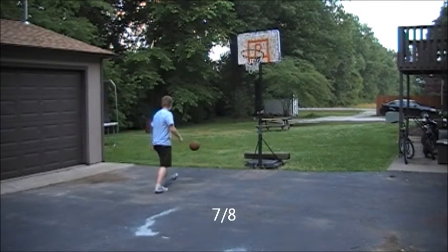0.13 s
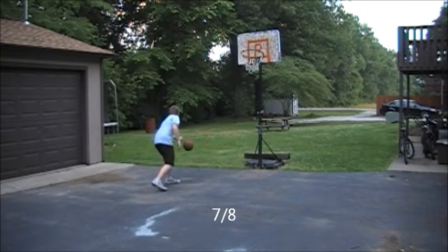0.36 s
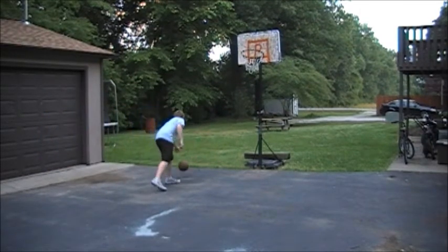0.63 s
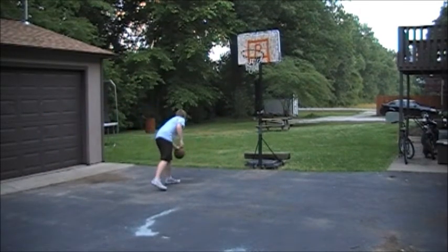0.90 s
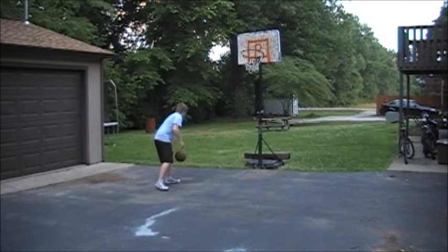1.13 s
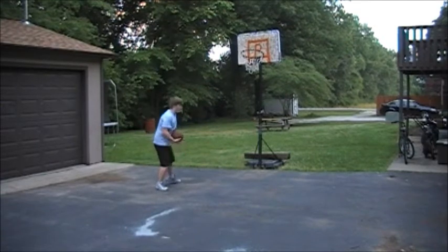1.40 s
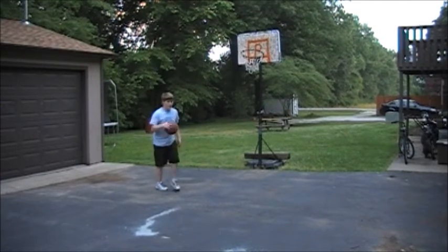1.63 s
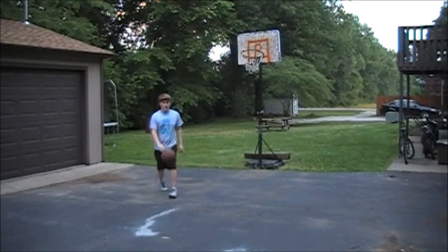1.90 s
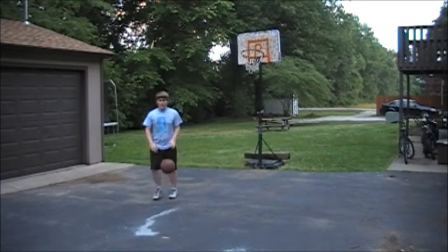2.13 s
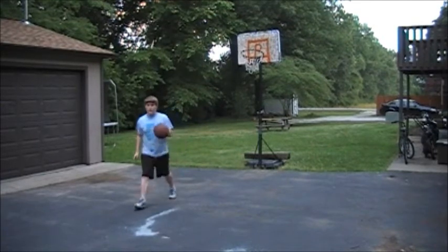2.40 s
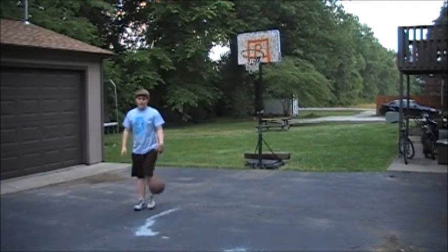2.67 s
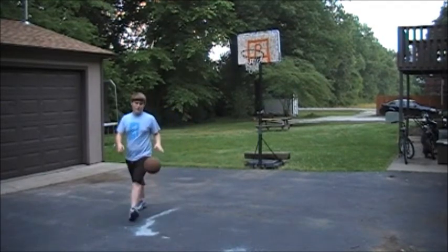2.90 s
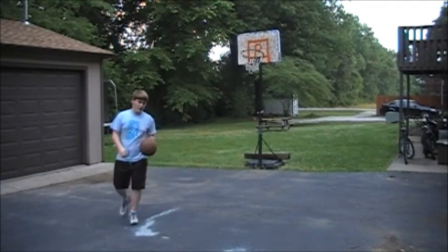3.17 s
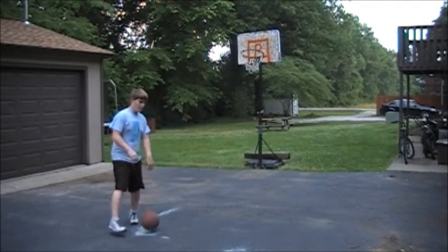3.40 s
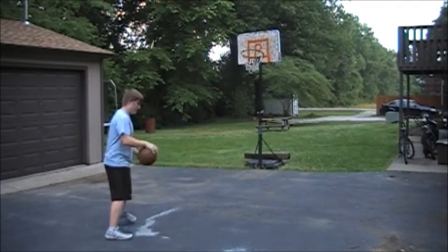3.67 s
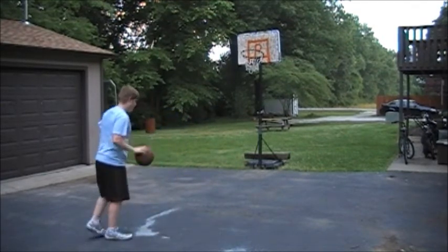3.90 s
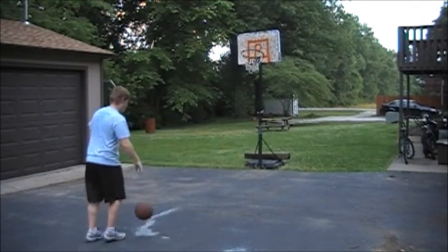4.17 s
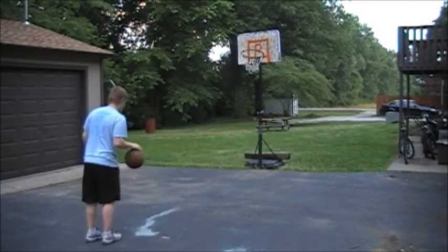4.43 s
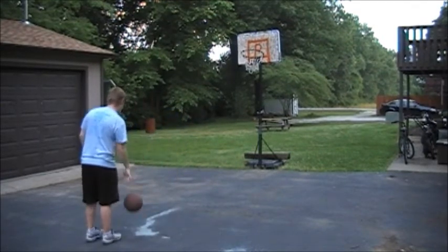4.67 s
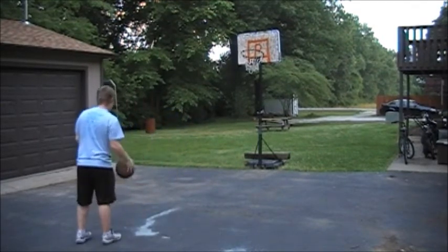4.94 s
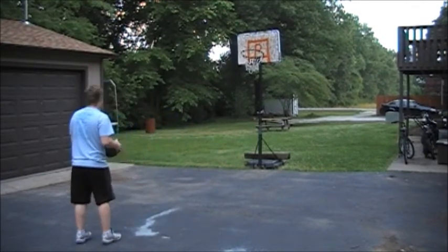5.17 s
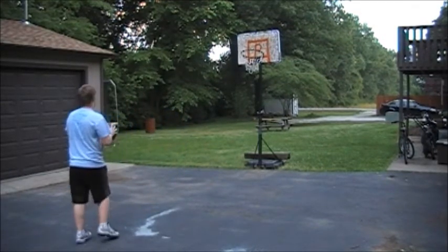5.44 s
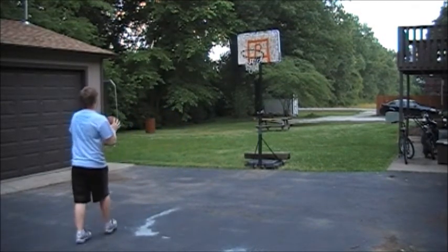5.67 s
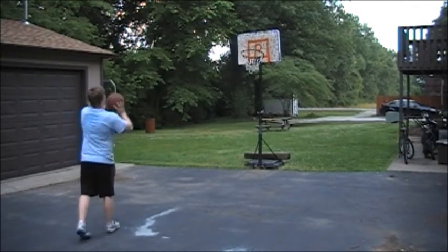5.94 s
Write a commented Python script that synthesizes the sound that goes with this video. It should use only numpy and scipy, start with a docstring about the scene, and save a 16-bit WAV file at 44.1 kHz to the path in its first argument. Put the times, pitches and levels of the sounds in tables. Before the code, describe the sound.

A stereo microphone stands back in a yard beside a garage. A rubber ball smacks asphalt about every two thirds of a second, with some longer gaps, giving a hollow ping and quick wall echoes. Shoes drag on grit and palms tap the ball. Thin whistles and crickets are faint at first; once the ball falls silent, warbles, chips and chattering birds come forward, joined by a high insect-like buzz.

```python
"""A basketball is dribbled on an asphalt driveway between a garage and a house.
Each bounce rings the ball's modes, slaps back from the walls as delayed blows and dies away as noise.
Filtered noise makes the scuffing shoes, hand pats, crickets, a late buzz and the outdoor hush;
gliding sines make the birds."""
import sys
import numpy as np
from scipy import signal
from scipy.fft import rfft, irfft
from scipy.io import wavfile

SR = 44100
rng = np.random.default_rng(int(sys.argv[2]) if len(sys.argv) > 2 else 0)


def how_loud(loudness_db):
    """Turn decibels into a plain amplitude multiplier (0 dB gives 1, 20 dB gives 10)."""
    steps = np.asarray(loudness_db, float) / 20
    return 10 ** steps


def transcribe(u):
    """Save the signal u as a 16-bit wav file named by the first command-line argument.

    u: samples, shape (n,) or (channels, n), limited to [-1, 1]; the rate is SR.
    q: integer samples, one column per channel.
    """
    v = np.clip(np.atleast_2d(u).T, -1, 1)
    q = np.round(v * 32767).astype(np.int16)
    wavfile.write(sys.argv[1], SR, q)


N = 267246
LEAD = SR // 10  # run-in, samples
LONG = N + LEAD
MIRROR = np.array([[1], [-1]])  # left, right

# Ball on asphalt, the first blow already dying away. Each row: time in seconds, relative peak in dB,
# relative strength heard in the yard in dB, treble in dB per octave, hollowness in dB.
BOUNCES = [(-.062, -11, -12.5, -9, -3), (0.6232, -18.5, -17, 5, -5.5), (1.0464, -8.5, -10, 2.5, -4.5),
           (2.051, 0, -9, 0, -6), (2.763, -4, -9, 5.5, -3), (3.4188, -2, -10.5, 3, -7.5),
           (4.1462, -11, -11.5, 3.5, 11.5), (4.759, -7.5, -8, 6, 5.5)]


def rms_one(x):
    """Scale to unit rms."""
    return x / np.sqrt(np.mean(x ** 2) + 1e-20)


def index(s):
    """Sample position of a time in seconds, run-in included."""
    return np.round(np.asarray(s) * SR).astype(int) + LEAD


def at_hz(points, hz):
    """Read a table on a log-frequency axis."""
    table_hz, value = np.transpose(points)
    return np.interp(np.log(hz), np.log(table_hz), value)


def drift(corner_hz):
    """Slow random wander of rms 1: noise through a double pole, computed at SR / 40."""
    r = np.exp(-2 * np.pi * corner_hz * 40 / SR)
    noise = rng.standard_normal(LONG // 40 + 2002)
    slow = signal.lfilter([1], [1, -2 * r, r * r], noise)[2000:]
    return np.interp(np.arange(LONG) / 40, np.arange(len(slow)), rms_one(slow))


def swell(count, rise):
    """A rounded rise and fall over count samples."""
    return np.sin(np.pi * np.linspace(0, 1, count) ** rise) ** 2


def band_noise(low_hz, high_hz, order):
    """Band-limited noise of unit rms."""
    band = signal.butter(order, [low_hz, high_hz], "band", fs=SR, output="sos")
    return rms_one(signal.sosfilt(band, rng.standard_normal(LONG)))


def diffuse(gains_at):
    """Half-octave bands of stereo noise; the hush comes from all round, the tails more from the front."""
    # Each row: frequency in Hz, left-right likeness of diffuse sound, clipped to -1..1.
    likeness = [(60, 1), (150, -0.53), (380, -0.65), (950, -0.31), (2380, 0.32), (5980, 0.49),
                (15000, -1.54)]
    out, edges_hz = 0, 33 * 2 ** np.arange(0, 9.1, .5)
    white = rng.standard_normal((2, 2, LONG))
    for k, (low, high) in enumerate(zip(edges_hz, edges_hz[1:])):
        band = signal.butter(2, [low, high], "band", fs=SR, output="sos")
        mid, side = signal.sosfilt(band, white[k % 2])
        hz = np.sqrt(low * high)
        alike = np.clip(at_hz(likeness, hz), -1, 1)
        front = np.clip(alike + 1.28, -1, .9)
        hush, tail = gains_at(hz)
        mid *= np.sqrt(hush ** 2 * (1 + alike) + tail ** 2 * (1 + front))
        side *= np.sqrt(hush ** 2 * (1 - alike) + tail ** 2 * (1 - front))
        out = out + mid + side * MIRROR
    return out


def outdoors():
    """A far hush wavers; trees and walls scatter each bounce back, every band dying at its own pace."""
    # Each row: frequency in Hz, relative density in dB per Hz.
    hush_spectrum = [(18, -53), (30, -42), (108, -0.5), (369, 3.5), (830, 1.5), (2360, -6.5), (4310, -13.5),
                     (5450, -11.5), (6050, -20.5), (7650, -13), (10200, -26.5), (12900, -24), (15500, -59)]
    # Each row: time in seconds, relative level in dB.
    hush_course = [(0.0, -54), (1.48, -57.5), (2.31, -51.5), (2.43, -56), (6.06, -54.5)]
    # Each row: frequency in Hz, relative density of the yard's answer in dB per Hz.
    yard_spectrum = [(35, -18), (60, -47), (117, 4), (229, -2), (390, 2.5), (679, -3.5), (1420, 3.5),
                     (3750, -19.5), (8040, -19), (11100, -34.5), (15000, -40)]
    # Each row: frequency in Hz, base decay time in seconds, multiplied below for near and far tails.
    yard_decay = [(80, 0.47), (250, 0.36), (700, 0.26), (1500, 0.33), (3000, 0.78), (6000, 0.7),
                  (12000, 0.19)]
    s, _, yard_db, _, _ = np.transpose(BOUNCES)
    blows = np.zeros(LONG)
    blows[index(s + .003)] = how_loud(yard_db)
    course_s, course_db = np.transpose(hush_course)
    hush_db = np.interp(np.arange(LONG), index(course_s), course_db)
    gusts, lumps = drift(1.97), drift(135)

    def decaying(t60_s):
        """Exponential tail after each blow."""
        return signal.lfilter([1], [1, -how_loud(-60 / (t60_s * SR))], blows)

    def gains_at(hz):
        """Gains of hush and tail in one band."""
        base_s = at_hz(yard_decay, hz)
        near, far = decaying(0.36 * base_s), decaying(1.65 * base_s)
        tail = how_loud(at_hz(yard_spectrum, hz) - 12.5 + 2.0 * lumps) * (near + how_loud(-7) * far)
        waver_db = 1.0 * gusts + 1.58 * drift(6.8)  # all bands together, each band alone
        hush = how_loud(at_hz(hush_spectrum, hz) + hush_db + 11 + waver_db)
        return hush, tail
    return diffuse(gains_at)


def crickets():
    """Narrow bands of noise, throbbing unevenly; the lower one grows, then falls silent."""
    # Each row: centre in Hz, width in Hz, mean throbs per second, throb depth 0-1, relative level in dB.
    singers = [(5400, 220, 40.0, .8, -69), (4750, 100, 9.0, .7, -67)]
    low_stops_s, low_growth_db_per_s = 1.5, 4
    out, t = [], (np.arange(LONG) - LEAD) / SR
    for hz, width_hz, per_s, depth, level_db in singers:
        throb_hz = per_s * (1 + 0.1473 * drift(3.08))
        throb = 1 + depth * np.sin(2 * np.pi * np.cumsum(throb_hz) / SR)
        out.append(how_loud(level_db) * throb * band_noise(hz - width_hz / 2, hz + width_hz / 2, 2))
    high, low = out
    return high + low * how_loud(low_growth_db_per_s * (t - 1)) * np.clip((low_stops_s - t) / .05, 0, 1)


def buzz():
    """A high dry buzz of steeply band-limited noise sets in near the end."""
    start_s, rise_s = 5.89, .07
    rise = np.clip((np.arange(LONG) - index(start_s)) / (rise_s * SR), 0, 1)
    return how_loud(-53.5 + 2 * drift(50)) * rise * band_noise(5900, 8400, 4)


def whistles(notes, bend, flutter_db):
    """Sines that glide fast at first and then level out; air and leaves make them flutter."""
    out = np.zeros(LONG + SR)
    for start_s, length_s, from_hz, to_hz, level_db in notes:
        first, last = index(start_s), index(start_s + length_s)
        u = np.linspace(0, 1, last - first)
        hz = to_hz + (from_hz - to_hz) * (1 - u) ** bend
        tone = np.sqrt(2) * np.sin(2 * np.pi * np.cumsum(hz) / SR)
        out[first:last] += how_loud(level_db) * swell(len(u), .7) ** .5 * tone
    return out[:LONG] * how_loud(flutter_db * drift(90))


def chatter(count):
    """A crowd of farther birds: many short notes at random times and pitches, mostly falling."""
    # Each row: time in seconds, relative level in dB.
    crowd_course = [(0, -65), (1.6, -87), (2.7, -64), (3.7, -73), (4.6, -63), (5.1, -57.5), (5.3, -50),
                    (5.55, -51.5), (5.7, -70), (5.8, -48), (6.06, -49.5)]
    when, pitch, glide, length, size = rng.random((count, 5)).T
    start_s, hz = when * N / SR, 2000 * 1.75 ** pitch
    level_db = np.interp(start_s, *np.transpose(crowd_course)) - 12 - 6 * size
    to_hz = hz * (1 + .45 * (glide - .65))
    notes = zip(start_s, .006 + .02 * length, hz, to_hz, level_db)
    return whistles(notes, bend=1.3, flutter_db=1.5)


def songs():
    """Lone whistles, a warbled phrase sung twice, low level notes and rounds of thin falling chips."""
    # Each row: start in seconds, length in seconds, from Hz, to Hz, relative level in dB.
    lone = [(.04, .04, 3220, 3180, -61), (.1, 0.081, 2440, 2770, -61), (.17, 0.073, 2390, 2290, -64),
            (.58, 0.028, 3060, 2500, -54.5), (.7, 0.058, 2410, 2654, -61), (.78, 0.06, 2420, 2400, -64),
            (.9, 0.073, 2420, 2700, -63.5), (1.01, 0.028, 2380, 2350, -61), (1.32, 0.071, 2390, 2330, -62),
            (1.4, 0.093, 2350, 2520, -60), (1.485, 0.11, 3175, 2980, -61), (1.55, .06, 3100, 2750, -70),
            (1.93, 0.038, 3300, 3250, -63), (2.005, 0.047, 2440, 2800, -56), (2.66, .03, 3250, 3120, -61.5),
            (2.69, 0.067, 3140, 2450, -59), (3.8, 0.16, 3310, 3296, -69), (3.97, 0.076, 2500, 2613, -59.5),
            (5.76, 0.022, 2950, 2270, -61), (5.59, .46, 6220, 6100, -70)]
    # Each row: seconds into the phrase, length in seconds, from Hz, to Hz, relative level in dB.
    phrase_notes = [(0, 0.048, 2270, 2497, -1.5), (0.047, 0.049, 3190, 3346, -0.5),
                    (.045, .05, 2600, 2560, -13), (0.094, 0.055, 3330, 3180, 0),
                    (.098, 0.14, 3217, 1890, 2), (.118, .1, 2950, 2880, -1.5),
                    (.165, 0.0562, 2683, 2500, -6), (0.2, .07, 1925, 1924, -13)]
    # Each row: start of the phrase in seconds, relative level in dB.
    sung = [(5.223, -55.5), (5.813, -53)]
    # Each row: start of the low note in seconds, relative level in dB.
    hoot_starts = [(5.286, -60.5), (5.544, -60.5), (5.791, -60)]
    # Each row: seconds into the round, length in seconds, from Hz, to Hz, relative level in dB.
    chip_notes = [(0, .045, 8300, 5200, -4), (.039, .05, 8700, 5000, 0)]
    # Each row: start of the round in seconds, relative level in dB.
    rounds = [(3.795, -62), (4.348, -68), (4.613, -62), (4.883, -60), (5.156, -58.5), (5.418, -57.5),
              (5.677, -56), (5.938, -56)]
    hoot_s, hoot_hz = 0.074, 1798

    def repeated(starts, notes):
        """Place a group of notes at each start."""
        return [(s + t, length_s, from_hz, to_hz, db + note_db)
                for s, db in starts for t, length_s, from_hz, to_hz, note_db in notes]

    hoots = [(s, hoot_s, hoot_hz, hoot_hz, db) for s, db in hoot_starts]
    song = whistles(lone + repeated(sung, phrase_notes) + hoots, bend=2.2, flutter_db=3.0)
    return song + whistles(repeated(rounds, chip_notes), bend=2.0, flutter_db=1.5)


def woods(x):
    """Far birds are smeared by a cloud of echoes from the trunks, different for each ear."""
    t = np.arange(12000) / SR
    common, opposed = rng.standard_normal((2, len(t))) * how_loud(-60 * t / .3)
    cloud = common + .6 * opposed * MIRROR
    return x + how_loud(-31) * signal.fftconvolve(x[None], cloud, axes=1)[:, :LONG]


def coloured(x, spectrum, tilt_db):
    """Shape a short burst by a spectrum, tilted in dB per octave about 3 kHz."""
    hz = np.fft.rfftfreq(len(x), 1 / SR) + 20
    gain_db = at_hz(spectrum, hz) + tilt_db * np.log2(hz / 3000)
    return rms_one(irfft(rfft(x) * how_loud(gain_db), len(x)))


def shoes():
    """Soles drag on grit: dense grains of uneven size under each drag, heavier drags duller."""
    # Each row: start in seconds, length in seconds, relative level in dB.
    scuffs = [(0.204, 0.19, -53), (0.442, 0.12, -67), (0.918, 0.14, -60), (1.695, 0.17, -52.5),
              (1.883, 0.11, -55.5), (2.411, 0.15, -48), (2.608, 0.13, -59), (3.581, 0.099, -50),
              (3.919, .105, -54), (4.086, 0.082, -53.5), (4.172, 0.098, -48), (5.959, 0.29, -55)]
    # Each row: frequency in Hz, relative density in dB per Hz before the tilt.
    grit = [(240, -37), (400, 0), (503, 22), (560, 11), (761, 3), (1100, 10.5), (3110, 0), (3910, -8.5),
            (8670, -10.5), (15500, -48)]
    mean_db = np.mean(scuffs, axis=0)[2]
    out = np.zeros(LONG + SR)
    for start_s, length_s, level_db in scuffs:
        first, last = index(start_s), index(start_s + length_s)
        tilt_db = 6.5 - 0.22 * (level_db - mean_db)  # per octave
        grains = rng.standard_normal(8192) * how_loud(1.8 * rng.exponential(1, 8192))
        texture = np.resize(coloured(grains, grit, tilt_db), last - first)
        out[first:last] += how_loud(level_db) * swell(last - first, 0.62) * texture
    return out[:LONG] * how_loud(2.0 * drift(38))


def ticks():
    """Hand pats and shoe ticks: puffs of noise that die fast, low pats narrow, high ticks broad."""
    # Each row: time in seconds, relative level in dB, centre in Hz.
    puffs = [(0.218, -30, 1400), (0.233, -36, 1590), (0.237, -39, 463), (0.291, -28, 4630),
             (0.489, -42, 467), (0.821, -40.5, 444), (0.826, -30.5, 8000), (1.763, -31, 7500),
             (1.777, -32, 8000), (1.797, -31, 7000), (1.853, -35.5, 1930), (1.879, -35, 2490),
             (2.0005, -34.5, 2180), (2.002, -30, 7500), (2.016, -37, 7000), (2.258, -27, 500),
             (2.2588, -24, 1690), (2.261, -20.5, 2520), (2.267, -33, 700), (2.346, -34, 1780),
             (2.402, -25.5, 3600), (2.476, -28, 3000), (3.5909, -27, 5400), (3.923, -33.5, 8000),
             (3.938, -38.5, 607), (4.975, -33, 5800), (5.056, -38, 4760)]
    out, t = np.zeros(LONG), np.arange(1500) / SR
    for s, level_db, hz in puffs:
        decay_cycles, spread = (5.0, 1.3) if hz < 800 else (5.5, 1.8)
        decay_s = decay_cycles / hz
        band = signal.butter(2, [hz / spread, min(hz * spread, 11000)], "band", fs=SR, output="sos")
        puff = signal.sosfilt(band, rng.standard_normal(len(t)) * np.exp(-t / decay_s))
        size = np.sqrt(np.mean(puff ** 2) * t[-1] / decay_s)
        out[index(s):index(s) + len(t)] += how_loud(level_db - 12.0) * puff / size
    return out


def scattered(x):
    """Posts, steps and trunks return small dulled copies, stronger on the right, weakening with delay."""
    lag, size, side = rng.random((150, 3)).T
    echoes = np.zeros((2, int(.3 * SR)))
    lag_s = .006 + .29 * lag ** 1.3
    echo_db = -31 - 60 * lag_s / 0.82 - 13.4 * size + 2.6 * (side - 1.5) * MIRROR
    polarity = np.sign(np.sin(50 * size))
    echoes[:, (lag_s * SR).astype(int)] = how_loud(echo_db) * polarity
    dull = signal.sosfilt(signal.butter(1, 4000, fs=SR, output="sos"), x)
    return x + signal.fftconvolve(dull, echoes, axes=1)[:, :LONG]


def ring(clicks, hz, t60_s):
    """A unit click sets a decaying sine ringing in a two-pole resonator."""
    r, w = how_loud(-60 / (t60_s * SR)), 2 * np.pi * hz / SR
    return signal.lfilter([0, np.sin(w)], [1, -2 * r * np.cos(w), r * r], clicks + 1e-18)


def all_blows():
    """Bounces, skin rebounds and wall echoes: rows of time, peak, treble, thump, hollowness and pan."""
    # For each bounce, how late the garage door answers, in seconds.
    door_detours_s = [.0115, .0115, .0117, .0163, .0187, .0190, .0202, .0195]
    # Walls that throw the bounce back. Each row: delay in seconds with the ball by the hoop,
    # share of the door's added detour.
    wall_lags = [(.0085, .15), (.0115, 1), (.0222, .9), (.0416, .63), (.058, -.5)]
    # What each wall returns. Each row: relative level in dB, dB per ms of added detour,
    # treble in dB per octave, its change per ms, thump in dB per octave, left-right dB.
    walls = [(-13, 0.72, -6.5, .5, 1, 0.5), (-8.5, -.6, 7, -0.78, -3, 2.5), (-25, -0.8, -10, -3, 1, 2),
             (-4, -1.76, -11.5, 0.75, -4.5, 2.5), (-19, -.5, -2, 0.46, 0.5, -4)]
    s, peak_db, yard_db, treble_db, hollow_db = np.transpose(BOUNCES)
    added_s = np.array(door_detours_s) - .0115
    added_ms = added_s * 1000
    none = 0 * s
    hollow_thump_db = 0.39 * hollow_db  # hollower bounces also thump more
    direct = (s, peak_db, treble_db, 3.5 + hollow_thump_db, hollow_db, none)
    rebound = (s + 0.002067, peak_db - 9 + hollow_db, none - 26, none, none, none)
    blows = [direct, rebound]
    for (lag_s, share), wall in zip(wall_lags, walls):
        level_db, db_per_ms, bright_db, bright_per_ms, thump_db, side_db = wall
        blows.append((s + lag_s + share * added_s,
                      yard_db + level_db + db_per_ms * added_ms,
                      bright_db + bright_per_ms * added_ms,
                      thump_db + hollow_thump_db,
                      .5 * hollow_db,
                      side_db + none))
    return np.hstack(blows)


def ball():
    """All blows strike the same modes, each coloured by its own treble, thump and hollowness."""
    # Modes: air cavity in the middle, skin below, slap of the tread above.
    # Each row: frequency in Hz, relative level in dB, t60 in seconds.
    modes = [(140, -44.5, 0.027), (249, -14.5, 0.03), (308, -52, 0.1), (425.5, -28.5, 0.076),
             (500, -27.5, 0.022), (598, -16.5, 0.035), (816, -22, 0.054), (1044, -58, 0.27),
             (1180, -29, 0.38), (1350, -20.5, 0.012), (1343, -28.5, 0.037), (1624, -7.5, 0.014),
             (1884, -5, 0.0059), (2300, -8, 0.0067), (2790, -5, 0.0032), (4700, -25.5, 0.005),
             (6130, -9, 0.0011), (8000, -9.5, 0.0016), (9330, -29, 0.0073), (10500, -86, 0.00067)]
    # Microphone pair. Each row: frequency in Hz, left-right dB.
    lean = [(60, 14), (150, -19), (300, -2), (640, -3.5), (1400, 3), (3100, -0.5), (6800, 0.5),
            (12000, -18)]
    s, peak_db, treble_db, thump_db, hollow_db, pan_db = all_blows()
    luck = rng.standard_normal((len(s), len(modes)))
    luck[:len(BOUNCES)] *= .5  # direct blows vary less
    skin, air = 0, 0
    for k, (hz, level_db, t60_s) in enumerate(modes):
        colour_db = treble_db * np.clip(np.log2(hz / 1600), 0, 1.5)
        colour_db += thump_db * np.clip(np.log2(900 / hz), 0, 1)
        # hollowness lifts the cavity and takes a share from the slap
        colour_db += hollow_db * ((900 < hz < 1500) - 0.18 * (1500 < hz < 2500))
        clicks = np.zeros((2, LONG))
        clicks[:, index(s)] = how_loud(peak_db + level_db + colour_db + 2.5 * luck[:, k] + .5 * pan_db * MIRROR)
        sound = ring(clicks, hz, t60_s) * how_loud(.5 * at_hz(lean, hz) * MIRROR)
        if hz < 700:
            skin = skin + sound
        else:
            air = air + sound
    push = np.hanning(int(.0018 * SR))  # the whole squash drives the skin, so it swells late
    skin = signal.lfilter(push / push.sum() * how_loud(1.5), [1], skin)
    skin = signal.sosfilt(signal.butter(4, 115, "high", fs=SR, output="sos"), skin)
    air = signal.sosfilt(signal.butter(4, 850, "high", fs=SR, output="sos"), air)
    return signal.sosfilt(signal.butter(4, 9500, fs=SR, output="sos"), skin + air)


def scene():
    """Sum of all sources; the run-in is dropped."""
    background = outdoors() + crickets() + buzz() + woods(songs() + chatter(count=6000))
    pats = scattered(ticks()[None] * [[1], [1]])
    return (background + shoes() + pats + scattered(ball()))[:, LEAD:]


def top_cut(x):
    """Nothing passes above the cut-off."""
    return signal.sosfilt(signal.butter(12, 16570, fs=SR, output="sos"), x)


def record(dry):
    """The bass is cut and the loudest peaks are rounded by a tanh curve."""
    thin = signal.sosfilt(signal.butter(1, 60, "high", fs=SR, output="sos"), dry)
    return top_cut(1.349 * np.tanh(thin / 1.713))


dry = scene()
out = record(dry)
transcribe(out)
```